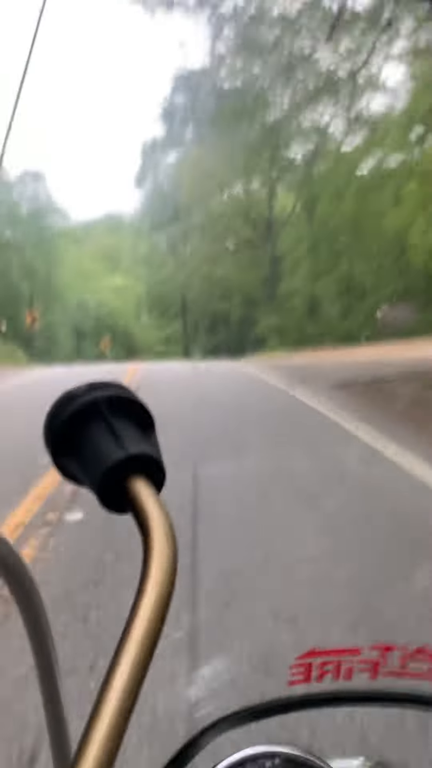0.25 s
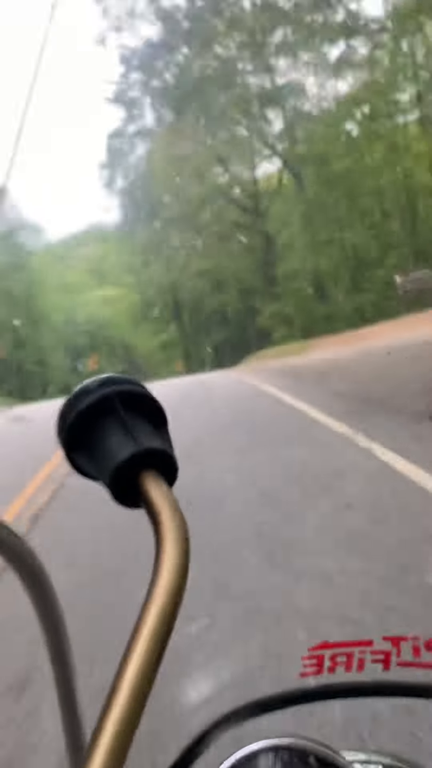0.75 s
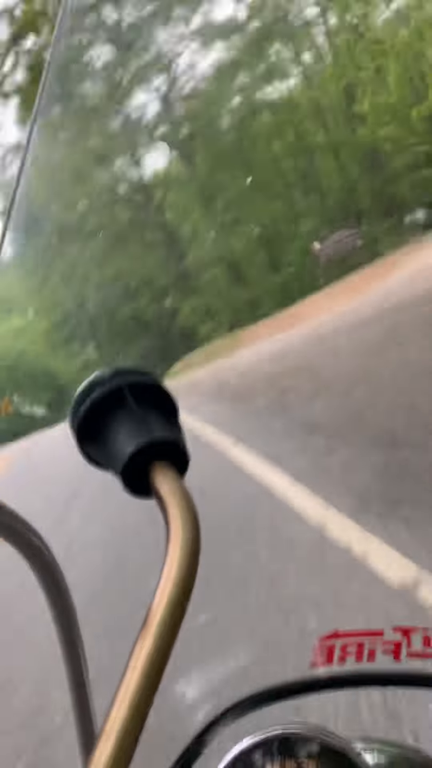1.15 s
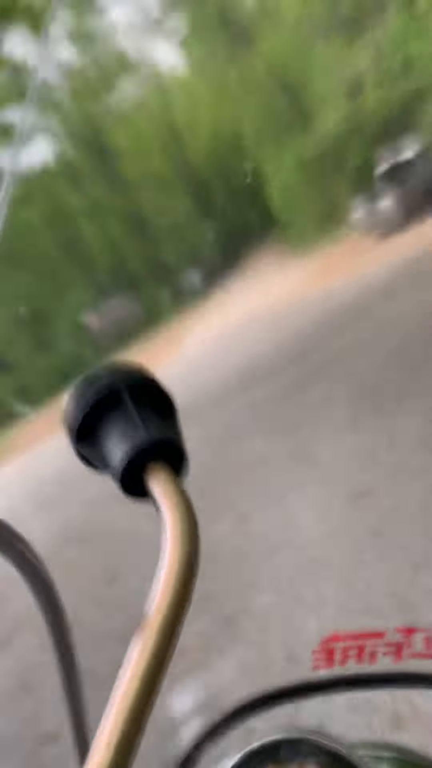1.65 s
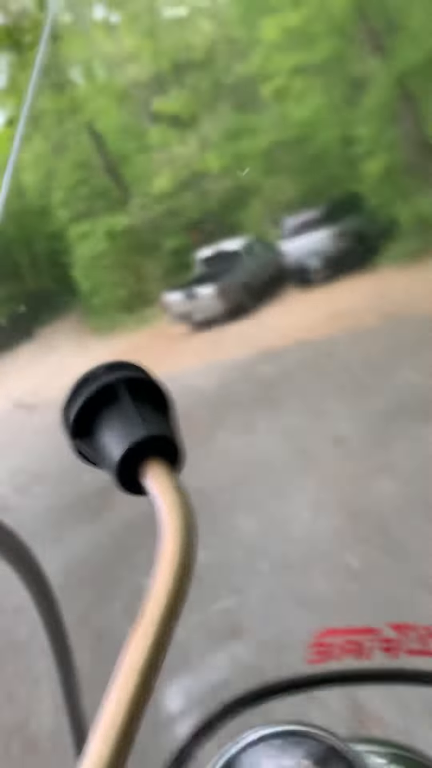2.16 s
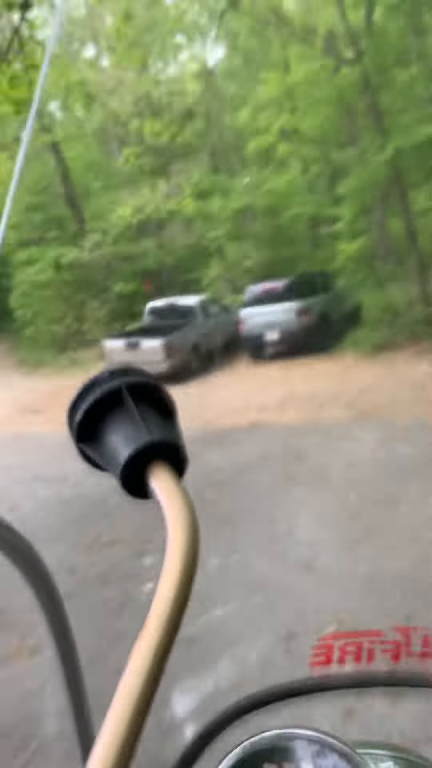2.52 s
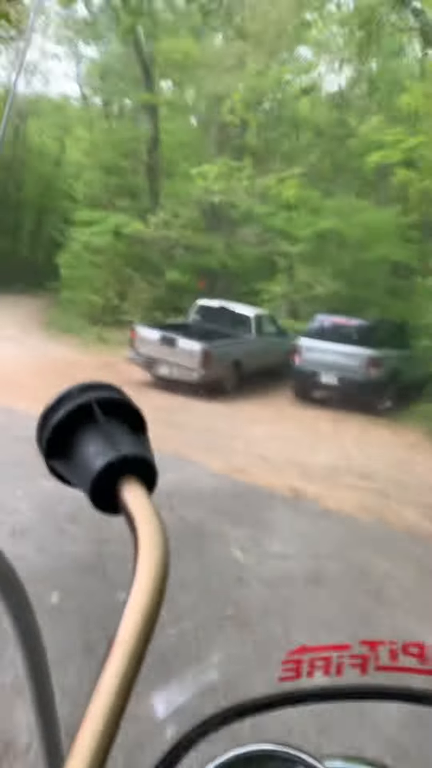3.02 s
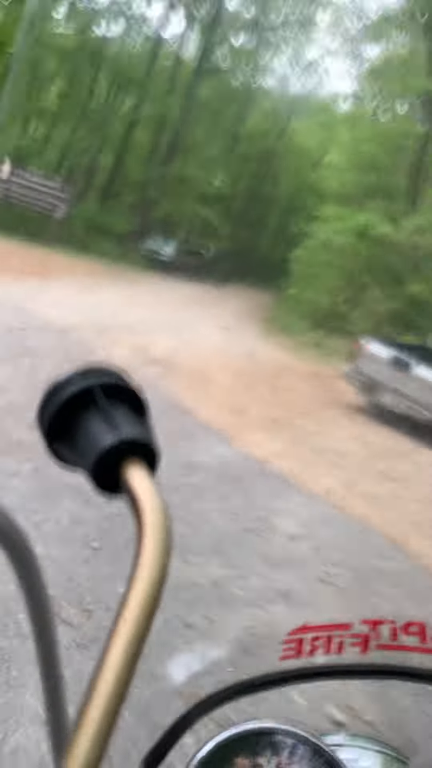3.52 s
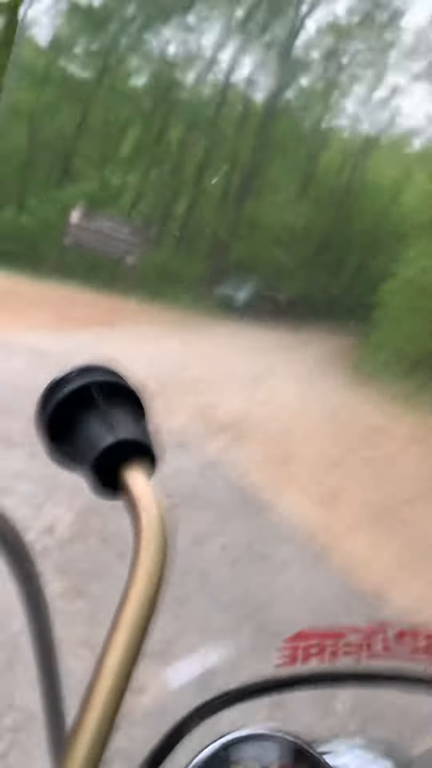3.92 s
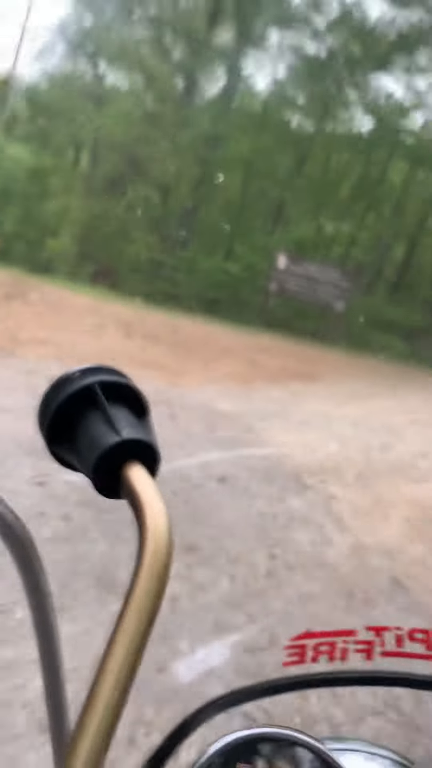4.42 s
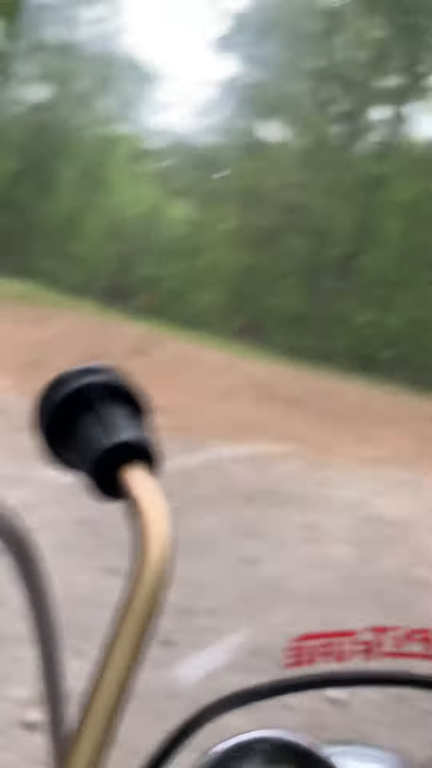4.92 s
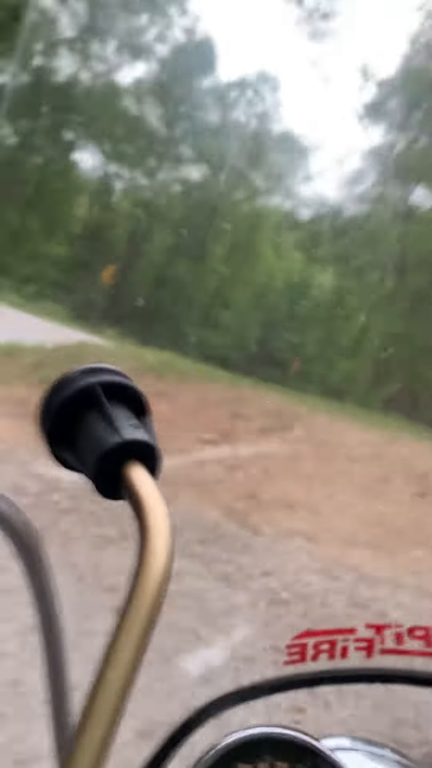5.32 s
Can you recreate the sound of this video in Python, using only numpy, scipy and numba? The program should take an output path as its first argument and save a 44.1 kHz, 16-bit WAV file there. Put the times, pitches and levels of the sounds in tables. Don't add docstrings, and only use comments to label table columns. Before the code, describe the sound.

A phone mounted on the bike picks up close engine sound in stereo. A quick downshift blip comes amid loud, buffeting wind and shaking bumps; the pitch sinks on engine braking, with deep pops and a thudding cluster of backfires. The rush then dies away and a low, uneven idle putters on, with tiny grit clicks and mechanical ticking.

```python
import sys
import numpy as np
from scipy import signal
from scipy.fft import rfft, irfft
from scipy.io import wavfile
from scipy.ndimage import uniform_filter1d
from numba import njit

SR = 44100
rng = np.random.default_rng(int(sys.argv[2]) if len(sys.argv) > 2 else 0)


def how_loud(loudness_db):
    steps = np.asarray(loudness_db, float) / 20
    return 10 ** steps


def waveform_to_disk(signal):
    frames = np.transpose(np.atleast_2d(signal))
    scaled = np.clip(frames, -1, 1) * 32767
    samples = np.round(scaled).astype(np.int16)
    wavfile.write(sys.argv[1], SR, samples)


N = 245637
T = np.arange(N) / SR

# f/Hz, level/dB
PIPE_TONE = [(25, -45), (48, -9.5), (70, 0.5), (150, 2.5), (210, -2.5), (280, -6), (320, -16), (370, -16),
             (445, -20), (520, -30.5), (900, -44.5), (2000, -84.5)]


def level(x, db):
    return x * how_loud(db) / np.sqrt(np.mean(x ** 2))


def curve(table):
    return np.interp(T, *np.transpose(table))


def on_log(hz, table):
    f, value = np.transpose(table)
    return np.interp(np.log(hz + 1e-9), np.log(f), value)


def colour(x, table):
    return irfft(rfft(x) * how_loud(on_log(np.fft.rfftfreq(N, 1 / SR), table)), N)


@njit
def svf(x, hz, damp):
    middle, high = np.empty(len(x)), np.empty(len(x))
    b, l = 0., 0.
    for i in range(len(x)):
        g = np.tan(np.pi * hz[i] / SR)
        v = (b + g * (x[i] - l)) / (1 + g * (g + damp))
        middle[i] = damp * v
        high[i] = x[i] - damp * v - l - g * v
        b, l = 2 * v - b, l + 2 * g * v
    return middle, high


def band(x, hz, width):
    return svf(x, np.full(len(x), min(hz, .45 * SR)), width / hz)[0]


def walk(rate):
    hold = int(SR / rate)
    steps = np.repeat(rng.standard_normal(N // hold + 1), hold)
    return 0.85 * uniform_filter1d(uniform_filter1d(steps, hold), hold)[:N]


def gusty(table, flicker_db, lo_hz, count):
    bands = 0
    for hz in lo_hz * 2 ** (np.arange(count) / 2):
        bands = bands + how_loud(flicker_db * walk(25.2)) * band(rng.standard_normal(N), hz, hz / 1.18)
    return level(colour(bands, table), 0)


def ports(x):
    lag_s, turn_rad = 10.5 / SR, 4.04
    f = np.fft.rfftfreq(N, 1 / SR)
    far = irfft(rfft(x) * np.exp(1j * (turn_rad - 2 * np.pi * f * lag_s)), N)
    return np.array([x, far])


def buffet(rush_db):
    rumble = band(band(rng.standard_normal(N), 63.0, 32.0), 68.0, 45.0)
    return level(rumble, 0) * how_loud(1.5 * rush_db - 1.5 + 7.6 * walk(5.4))


def wind_rush(rush_db, throb):
    # f/Hz, level per Hz/dB
    roar = [(180, 5.5), (300, 4), (339, -6), (452, -4.5), (524, -14.5), (680, -15), (930, -11), (1260, -16),
            (1570, -29), (2030, -44.5), (2400, -43.5), (3120, -57.5), (5280, -120)]
    moving = np.clip((rush_db + 49.0) / 5, 0, 1)
    shared = gusty(roar, 0.89, lo_hz=300., count=7)
    sides = [shared + 0.42 * gusty(roar, 0.53, lo_hz=300., count=7) for _ in range(2)]
    return np.array(sides) * how_loud(rush_db - 1.5) * moving * throb


def air_hiss(rush_db, shake, throb):
    # f/Hz, level per Hz/dB
    tone = [(500, -6), (750, -6), (1100, -13), (2200, -14.5), (2500, -20), (4700, -20), (7000, -25.5),
            (8800, -30), (10300, -25), (12500, -31.5), (16000, -29)]
    still_db, per_wind = -61.5, 0.5
    bump_db = -10
    hiss = how_loud(still_db + per_wind * (rush_db + 48)) + how_loud(bump_db) * shake
    common = ports(gusty(tone, 4.2, lo_hz=1500., count=8))
    apart = []
    for _ in range(2):
        fine = gusty(tone, 0.77, lo_hz=1500., count=8)
        coarse = gusty(tone, 3.9, lo_hz=403.0, count=5)
        apart.append(.5 * fine + 1.95 * coarse)
    return (common + np.array(apart)) * hiss * how_loud(3.5) * throb


def grit():
    # t/s, peak level/dB, f/Hz, width/Hz, length/ms
    hits = [(0.062, -9, 52, 17, 40), (0.105, -44, 1500, 2000, 2.9), (0.378, -40, 9750, 14000, 14),
            (1.356, -31, 1007, 600, 5), (1.626, -49, 1018, 594, 5.5), (1.828, -44, 3400, 548, 13),
            (1.91, -38.5, 980, 690, 2.5), (2.408, -41, 2180, 2460, 2.5), (4.118, -54.5, 12440, 6050, 1.5),
            (4.142, -47, 8270, 12000, 2.8), (4.157, -51, 10000, 3100, 4.5), (4.18, -55.5, 12900, 5970, 2.1),
            (4.206, -51, 11830, 9000, 4), (4.358, -43, 6170, 2500, 6.1), (4.361, -47, 11560, 8100, 7.6),
            (4.506, -50, 8400, 2050, 2.3)]
    out = np.zeros(N)
    t = np.arange(8000) / SR
    for s, db, hz, width, ms in hits:
        hit = rng.standard_normal(8000) * np.exp(-t * 1000 / ms)
        burst = band(band(hit, 1. * hz, 1. * width), 1. * hz, 2 * width)
        i = int(s * SR)
        out[i:i + 8000] += how_loud(db) * burst / np.abs(burst).max()
    return out


def bumps():
    # t/s, level/dB
    jolts = [(.01, -46.5), (.058, -56), (.102, -45.5), (0.184, -49.5), (.285, -49), (0.329, -51.5),
             (0.385, -41.5), (0.439, -48), (.483, -44.5), (.505, -50), (0.541, -42), (.575, -44.5),
             (0.601, -39.5), (0.649, -45), (0.698, -46.5), (.737, -45), (0.763, -57), (.822, -47.5),
             (1.107, -53)]
    rise_s, fall_s = .004, .016
    shake = 1e-6
    for s, db in jolts:
        t = np.clip(T - s + rise_s, 0, None)
        shake = shake + how_loud(db) * (1 - np.exp(-t / rise_s)) * np.exp(-t / fall_s) * 2
    return shake


def mount(count, hz, shake):
    # f/Hz, width/Hz, level/dB
    clamp = [(4400, 350, 0), (9300, 500, -3), (10100, 600, -2), (11600, 700, -3), (13000, 1200, -8),
             (14800, 1200, -12)]
    rest_db = -56
    buzz = shake + how_loud(rest_db) * np.clip((hz - 50) / 12, 0, 1)
    gate = np.exp(-(2 * count % 1) / .45) * how_loud(4.5 * walk(90))
    clicks = gate * rng.standard_normal(N)
    ring = sum(how_loud(db) * band(clicks, 1. * f, 1. * width) for f, width, db in clamp)
    return level(ring, 0) * buzz * np.clip((hz - 40) / 9, 0, 1)


def valves(count):
    # place in the two-firing cycle/0-1, f/Hz, width/Hz, level/dB, left minus right/dB
    ticks = [(.04, 750, 199, -68, 5.5), (.07, 1280, 300, -71.5, -14), (.4, 1009, 141.4, -67, -13.5),
             (.51, 713, 223, -67, 8), (.87, 713, 198, -66.5, 14), (.88, 1267, 506, -69, 5)]
    out = 0
    for place, hz, width, db, pan_db in ticks:
        turns = count / 2 + 1 - place
        strength = how_loud(1.8 * np.tanh(rng.standard_normal(400)))[turns.astype(int)]
        rattle = np.sign(rng.standard_normal(N)) + 5 * (turns % 1 < .004)
        burst = strength * np.exp(-(turns % 1) / .03) * rattle
        ring = band(band(burst, 1. * hz, 1. * width), 1. * hz, 1. * width)
        out = out + level(ring, db) * how_loud(np.array([[pan_db], [-pan_db]]) / 2)
    return out


def firing_note(hz, count, idle):
    # multiple of the firing rate, level/dB
    idle_orders = [(1, -51), (2, -54.5), (3, 2.5), (4, -1), (5, -3), (6, -16.5), (7, 0.5), (8, -2),
                   (9, 2.5), (10, -15), (11, -5.5), (12, -15), (13, -12), (14, -21.5)]
    idle_half_db, coast_half_db, coast_odd_db = -20, -14.5, -11.5
    intake_hz, intake_width_hz, intake_db = 706, 167, -24.5
    multiples, levels_db = np.transpose(idle_orders)
    note = 0
    for k in np.arange(1, 2 * len(idle_orders) + 1) / 2:
        half = k % 1 > 0
        idle_db = np.interp(k, multiples, levels_db) + (idle_half_db if half else 0)
        parity_db = coast_half_db if half else coast_odd_db if k % 2 and k > 1 else 0
        coast_db = parity_db + on_log(k * hz, PIPE_TONE)
        air_box = 1 / (1 + (2 * (k * hz - intake_hz) / intake_width_hz) ** 2)
        intake = how_loud(intake_db) * np.clip((hz - 55) / 20, 0, 1) * (not half) * air_box
        strength = how_loud(idle * idle_db + (1.5 - idle) * coast_db) + intake
        note = note + strength * np.cos(2 * np.pi * k * count)
    return note / np.sqrt(uniform_filter1d(note ** 2, size=SR // 6))


def uneven_pops(count, chance):
    steps = np.diff(np.floor(count + 0.1984 * chance[1]), prepend=1)
    gas = 0.032 * rng.standard_normal(N)
    pops = colour(steps * chance[0] + gas, PIPE_TONE)
    return pops / np.sqrt(uniform_filter1d(pops ** 2, size=SR // 5))


def backfires():
    # t/s, peak level/dB
    bangs = [(1.098, -4), (1.359, -19), (1.628, -18), (1.7, -14), (1.952, -28.5), (2.101, -7), (2.139, -19),
             (2.209, -1), (2.324, -3.5), (2.387, -24.5), (2.451, -24), (2.526, -19), (2.559, -42)]
    kicks = np.zeros(N)
    for s, peak_db in bangs:
        kicks[int(s * SR)] = how_loud(peak_db - 12.5)
    one_kick = colour(np.eye(1, N)[0], PIPE_TONE)
    return colour(kicks, PIPE_TONE) / one_kick[0]


def pipe_delay(x):
    # f/Hz, width/Hz, weight/dB
    modes = [(95, 24, 0), (160, 60, 0), (305, 50, 7)]
    f = np.fft.rfftfreq(N, 1 / SR) + 1e-9
    ring = sum(how_loud(db) / (1 + 1j * (f - hz ** 2 / f) / width) for hz, width, db in modes)
    ring = ring / (1 - (62 / f) ** 2 - 1j * 62 / f / 1.3)
    return irfft(rfft(x) * ring / np.abs(ring), N)


def exhaust(hz, count):
    # t/s, level/dB
    loudness = [(0.0, -20.5), (0.2, -21), (0.45, -16.5), (0.7, -15.5), (1.26, -18), (1.86, -20),
                (2.0, -21.5), (3.1, -22), (4.81, -25), (5.57, -22.5)]
    # t/s, idle share/0-1
    settling = [
        (0, 0.04),
        (2.45, 0.1),
        (2.62, 0.79),
        (5.57, 0.7),
    ]
    open_db, shut_db, shut_s = -4, 0.9, .45
    idle = curve(settling)
    firing = np.floor(count + .5).astype(int)
    chance = np.tanh(rng.standard_normal((400, 2)))[firing].T
    scatter_db = .8 * idle + 2.5 * (1 - idle)
    note = firing_note(hz, count, idle) * how_loud(scatter_db * uniform_filter1d(chance[0], size=SR // 100))
    pops = uneven_pops(count, chance)
    most_db = np.where(T < shut_s, open_db, shut_db)
    share = how_loud(np.minimum(most_db, np.clip((62 - hz) / 2, -8, 3) - 20 * idle))
    mix = (note + share * pops) / np.sqrt(1 + share ** 2)
    return pipe_delay(mix * how_loud(curve(loudness)) + backfires())


def from_left(pipe):
    # t/s, left minus right/dB
    pan = [
        (0, -4),
        (3, 6.5),
        (4.5, 23),
        (5.57, 19.5),
    ]
    # f/Hz, level/dB
    tilt = [(60, -12), (110, -6.5), (200, 0.5), (400, 3.5)]
    lean = np.tanh(curve(pan) / 54.0) * colour(np.roll(pipe, shift=-12), tilt)
    return np.array([pipe + lean, pipe - lean])


def scene():
    # t/s, firings per second/Hz
    revs = [(0.0, 50.79), (0.15, 50.59), (0.22, 53.59), (0.42, 78.86), (0.55, 76.28), (1.7, 45.35),
            (2.0, 39.31), (2.2, 37.43), (2.55, 27.4), (2.7, 25.0), (2.9, 24.44), (3.6, 23.76),
            (3.85, 24.17), (4.1, 23.45), (4.35, 23.21), (4.8, 22.57), (5.57, 21.88)]
    # t/s, level/dB
    wind = [(0, -33), (0.2, -29.5), (0.42, -27), (1.15, -28.5), (1.65, -33), (2.08, -38), (2.5, -46),
            (5.57, -47)]
    hz = curve(revs)
    count = 1.403 + np.cumsum(hz) / SR
    rush_db = curve(wind)
    shake = bumps()
    throb = 1 + 0.11 * np.cos(2 * np.pi * count - .5)
    air = buffet(rush_db) + wind_rush(rush_db, throb) + air_hiss(rush_db, shake, throb)
    rattles = ports(grit() + mount(count, hz, shake))
    engine = valves(count) + from_left(exhaust(hz, count))
    return air + rattles + engine


def suppress(x, power):
    # t/s, f/Hz
    mono_below = [(0, 986), (1.2, 855), (2, 677), (2.9, 297), (3.3, 193), (3.9, 126), (4.2, 55.6),
                  (5.57, 29)]
    # from f/Hz, to f/Hz
    no_mid = [(4250, 5150), (8280, 9600), (12420, 13770), (15800, 22050)]
    # from f/Hz, to f/Hz
    no_side = [(6250, 7580), (10340, 11700), (14500, 22050)]
    knocks = [
        .39,
        .54,
        4.14,
        4.37,
    ]
    wander_hz, leak_s, leak_db, hole_share = 150, .013, -7, .36
    f, s, z = signal.stft(x, SR, nperseg=2048)
    f, size = f[:, None], np.abs(z) + 1e-12
    ratio = size / uniform_filter1d(size, size=15, axis=1)
    gain = ratio ** power * ((ratio > hole_share) | (f < 1500))
    gain[:, :20] = 1
    gain[1] *= f > np.interp(s, *np.transpose(mono_below))
    near_knock = (np.abs(s - np.array(knocks)[:, None]) < leak_s).any(axis=0)
    leak = how_loud(leak_db) * near_knock * (f < 15800)

    def edge(hz):
        return hz + wander_hz * np.interp(s, T, walk(12)) * (hz < 15000)

    for channel, bands in enumerate((no_mid, no_side)):
        for lo, hi in bands:
            gain[channel] *= np.where((f < edge(lo)) | (f > edge(hi)), 1, leak)
    return signal.istft(z * gain, nperseg=2048)[1][:, :N]


def roll_off(x):
    return signal.sosfilt(signal.butter(12, 16360, fs=SR, output="sos"), x)


def record(dry):
    mid, side = (dry[0] + dry[1]) / 2, (dry[0] - dry[1]) / 2
    mid, side = suppress(np.array([mid, side]), power=.45)
    return roll_off(np.array([mid + side, mid - side]))


dry = scene()
out = record(dry)
waveform_to_disk(out)
```